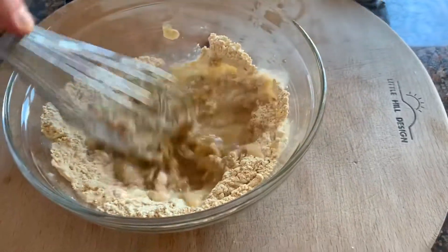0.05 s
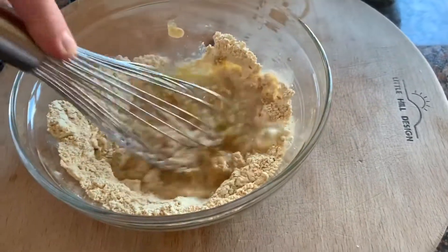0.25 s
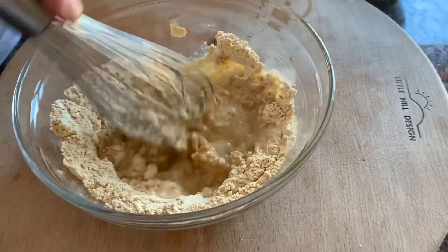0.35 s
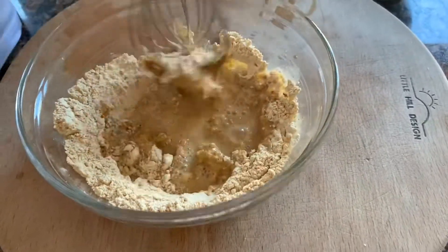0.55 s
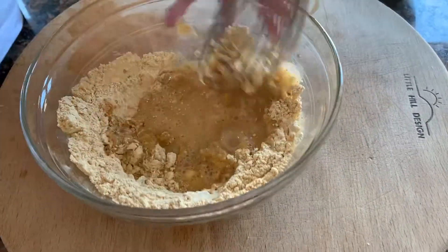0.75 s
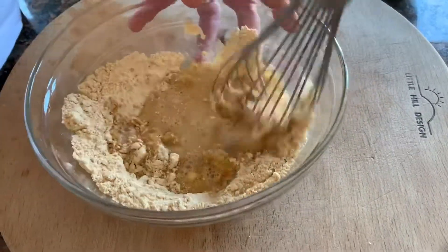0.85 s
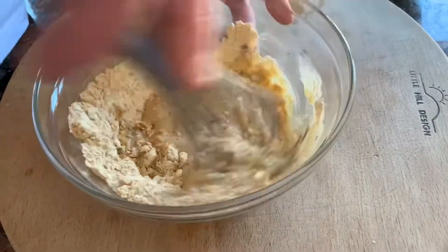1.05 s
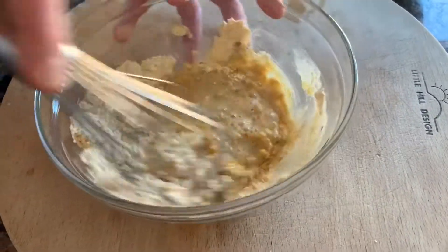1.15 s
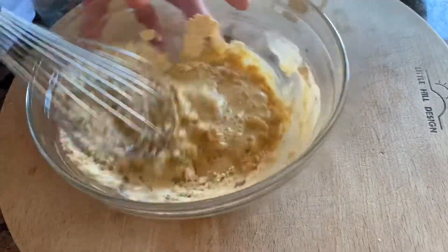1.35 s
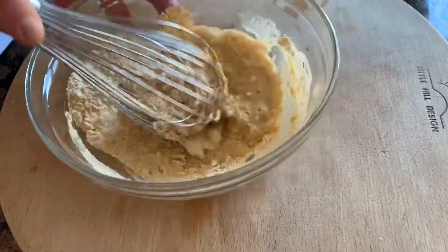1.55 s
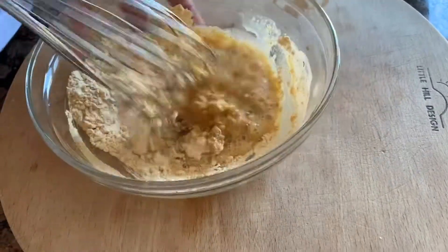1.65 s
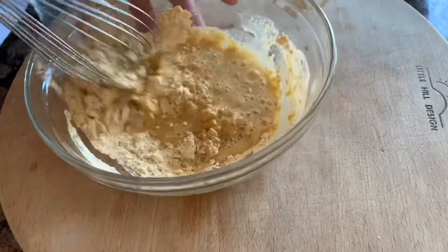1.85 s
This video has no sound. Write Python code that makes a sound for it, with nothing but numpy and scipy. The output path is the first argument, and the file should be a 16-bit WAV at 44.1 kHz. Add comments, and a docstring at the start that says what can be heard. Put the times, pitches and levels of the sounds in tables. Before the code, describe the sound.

A wire whisk works through thick batter, thudding and knocking against a glass bowl.

```python
"""A wire whisk works stiff batter in a glass bowl on a wooden board, close by in a kitchen.
Its wires thud through the batter and knock twice on the coated glass, which rings.
The stroke drags round the bowl among wet crackle, smacks and small ticks, while the
whisk's weight bumps the board. At the end a bare wire clinks on the glass."""
import sys
import numpy as np
from scipy import signal
from scipy.fft import rfft, irfft
from scipy.io import wavfile

SR = 44100
rng = np.random.default_rng(int(sys.argv[2]) if len(sys.argv) > 2 else 0)


def log_audio(samples):
    """Write samples as a 16-bit WAV file to the path given in sys.argv[1]."""
    # one column per channel
    frames = np.atleast_2d(samples).T
    # limit to full scale, then quantise
    limited = np.clip(frames, -1, 1)
    pcm = np.round(limited * 32767).astype(np.int16)
    wavfile.write(sys.argv[1], SR, pcm)


N = 83790
T, HZ = np.arange(N) / SR, np.fft.rfftfreq(2 * N, 1 / SR)
# low ring of the bowl on its board: pitch_hz, level_db, t60_s
BODY_MODES = [(149, -2, 0.091), (183.1, -4, 0.31), (223, -6.5, 0.14), (316, -10, 0.34), (481, 0, 0.13),
              (592.3, 0, 0.18)]


def amp(db):
    """Decibels to gain."""
    return 10 ** (np.asarray(db) / 20)


def unit_rms(x):
    """Scales to rms 1."""
    return x / np.sqrt(np.mean(x ** 2) + 1e-20)


def curve(points, hz=HZ):
    """Reads a table on a log-frequency axis."""
    freq, value = np.transpose(points)
    return np.interp(np.log(hz + 1), np.log(freq + 1), value)


def swell(peak_s):
    """An envelope that rises to 1 and dies away."""
    return T / peak_s * np.exp(1 - T / peak_s)


def add(mix, start_s, sound):
    """Mixes a sound in at its start time."""
    part = mix[..., round(start_s * SR):][..., :sound.shape[-1]]
    part += sound[..., :part.shape[-1]]


def filtered(x, response):
    """Applies a frequency response."""
    return irfft(rfft(x, 2 * N) * response)[..., :N]


def colour(x, eq):
    """Causal EQ, scaled to keep the power of white noise."""
    gain = unit_rms(amp(curve(eq)))
    log_gain = np.log(np.r_[gain, gain[-2:0:-1]])
    return filtered(x, np.exp(np.conj(signal.hilbert(log_gain)))[:N + 1])


def stereo(pair, width):
    """Blends two unrelated signals to a left-right correlation set by frequency."""
    correlation = np.clip(curve(width), -1, 1)
    mid = filtered(pair[0], np.sqrt((1 + correlation) / 2))
    side = filtered(pair[1], np.sqrt((1 - correlation) / 2))
    return np.array([mid + side, mid - side])


def noise(width=None):
    """Stereo white noise, by default with the width of a close source."""
    # close stereo image: freq_hz, correlation
    close_width = [(100, 0.91), (400, .93), (800, 0.57), (1500, 0.34), (2700, 0.068), (6000, 0.47),
                   (10000, 0.93), (14000, 1)]
    return stereo(rng.choice([-1., 1.], (2, N)), width or close_width)


def ring(modes, waver=0, waver_hz=120):
    """Dying sines of a struck object; with waver, rubbing wires unsettle the high ones most."""
    out, t = np.zeros(N), T[:N // 3]
    knots = rng.standard_normal((len(modes), 2, 400))
    for k, (hz, db, t60) in enumerate(modes):
        real, imag = (np.interp(t * waver_hz, np.arange(len(row)), row) for row in knots[k])
        wobble = 1 + waver * np.sqrt(hz / 4000) * (real + 1j * imag)
        tone = unit_rms(abs(wobble)) * np.sin(2 * np.pi * hz * t + np.angle(wobble))
        add(out, 0, (-1) ** k * amp(db - 60 * t / t60) * tone)
    return out


def friction(texture, levels, eq):
    """A texture that swells and fades with the stroke."""
    return colour(unit_rms(texture) * amp(np.interp(T, *np.transpose(levels))), eq)


def room_tone(level_db=-70):
    """A faint, steady rumble under everything."""
    # bass-heavy bed: freq_hz, gain_db
    eq = [(20, -17), (65, -1), (110, -10.5), (250, -14), (600, -36), (2000, -25), (16000, -40.5)]
    return amp(level_db) * colour(noise(), eq)


def drag():
    """The whisk drags through the batter with a dark scrape."""
    # swell of the stroke: time_s, level_db
    levels = [(0, -59), (.09, -59), (.125, -50), (.18, -56.5), (.27, -41.5), (.5, -59), (.57, -50.5),
              (.8, -53), (.88, -60), (.99, -68), (1.09, -62.5), (1.2, -59.5), (1.369, -48.5), (1.45, -53.5),
              (1.58, -76.5), (1.74, -82), (1.829, -56), (1.9, -69.5)]
    # muffled scrape: freq_hz, gain_db
    eq = [(25, -40.5), (65, -6), (105, -3), (180, 1), (300, -1), (600, -1), (900, -5.5), (1400, -9),
          (2200, -20.5), (4000, -31), (16000, -69)]
    return friction(noise(), levels, eq)


def pops(per_s=900, sizes=24, spread_db=3, decay_cycles=3):
    """Sparse bubbles of many sizes, each ringing for a few cycles."""
    out, t = np.zeros(N), T[:SR // 100]
    for hz in np.geomspace(3500, 14000, sizes):
        strength = amp(spread_db * np.minimum(rng.exponential(1, N), 4))
        bursts = rng.random(N) < per_s / sizes / SR
        bubble = np.sqrt(hz) * np.exp(-hz * t / decay_cycles) * np.sin(2 * np.pi * hz * t)
        out += signal.oaconvolve(strength * bursts, bubble)[:N]
    return unit_rms(out)


def crackle(pop_db=-5):
    """Batter and crumbs crackle wetly: hiss dotted with bubbles."""
    # swell of the crackle: time_s, level_db
    levels = [(0, -63), (0.051, -75.5), (0.073, -60), (0.113, -53.5), (.14, -66), (.3, -76.5), (.46, -69),
              (0.751, -61.5), (.85, -72.5), (.92, -63.5), (1, -70.5), (1.021, -61), (1.07, -57.5),
              (1.1, -66), (1.279, -69), (1.64, -73), (1.76, -86), (1.9, -78)]
    # wet fizz: freq_hz, gain_db
    eq = [(200, 4), (900, -4.5), (1700, 10), (3000, -2.5), (5000, -0.5), (8000, 2), (11000, -8.5),
          (13500, -4), (16000, -33.5)]
    return friction(noise() + amp(pop_db) * pops(), levels, eq)


def ticks(snap_db=9, snap_s=0.00046):
    """Wires and snapping batter tick, a spike and a puff each; longer ticks have less spike."""
    # small ticks: start_s, level_db, decay_s
    hits = [(0.0717, -55, 0.0028), (.519, -56, 0.0055), (1.0115, -48.5, 0.0026), (1.021, -47.5, .0015),
            (1.0716, -49, 0.0027), (1.1877, -28.5, 0.0019), (1.395, -53.5, 0.0011), (1.514, -58, .001)]
    # bright snap: freq_hz, gain_db
    eq = [(100, -27), (1900, -15), (2550, 4), (3200, 0.5), (3700, -6), (5500, -1.5), (8500, 0.5),
          (11000, -3.5), (13000, 2), (16000, -5)]
    out = np.zeros((2, N))
    for start, db, decay in hits:
        puff = np.exp(-T / decay) * noise()
        spike = amp(snap_db) * np.exp(1 - decay / snap_s) * (T == 0)
        add(out, start, amp(db) * (puff + spike))
    return colour(out, eq)


def board_bumps(pitch_hz=69.6, swell_s=.028):
    """The whisk's weight pushes the board, which sways for a few deep, soft cycles."""
    # pushes on the board: start_s, level_db
    pushes = [(0.101, -47.5), (0.216, -46), (0.399, -61), (0.532, -53), (.6, -50.5), (0.681, -53),
              (0.76, -53.5), (1.343, -53.5), (1.812, -62.5)]
    out = np.zeros(N)
    sway = swell(swell_s) ** 2 * np.sin(2 * np.pi * pitch_hz * T)
    for start, db in pushes:
        add(out, start, amp(db) * sway)
    return out


def falling_tone(from_hz, to_hz, fall_s):
    """A sine whose pitch drops and settles."""
    hz = to_hz + (from_hz - to_hz) * np.exp(-T / fall_s)
    return np.sin(2 * np.pi * np.cumsum(hz) / SR)


def thuds(thump_db=-15.5, thump_s=.008, batter_cutoff_hz=1600, return_cutoff_hz=710):
    """Wires bump through the batter: quick falling chirps that return twice and ring the bowl."""
    # wire bumps: peak_s, level_db, pitch_fall_s, body_ring_db
    hits = [(0.1024, -39.5, .002, -11), (.109, -42, .002, 1), (.1165, -39.5, .0019, 1.5),
            (0.5238, -35.5, 0.0015, -11), (.5888, -26.5, .0018, -15), (0.6217, -27, .0013, -11),
            (0.6754, -25.5, 0.001904, -12.5), (.709, -33.5, .0015, -16), (0.7543, -26.5, .0017, -23),
            (0.801, -39.5, .0017, -5.5)]
    # duller returns through bowl and board: delay_s, gain_db
    returns = [(.0057, 0.5), (.0101, -5)]
    chirps, resonance, body = np.zeros(N), np.zeros(N), ring(BODY_MODES)
    thump = swell(thump_s) * falling_tone(477, 102, thump_s)  # the batter gives way
    for time, db, fall, body_db in hits:
        rise = 1.6 * fall
        chirp = swell(rise) ** 6.7 * falling_tone(2586, 165, fall)
        add(chirps, time - rise, amp(db) * chirp)
        add(resonance, time, amp(db + body_db) * body + amp(db + thump_db) * thump)
    chirps = filtered(chirps, 1 / (1 + (HZ / batter_cutoff_hz) ** 10))
    dull = filtered(chirps, 1 / (1 + (HZ / return_cutoff_hz) ** 4))
    for polarity, (delay, db) in zip((-1, 1), returns):
        add(resonance, delay, polarity * amp(db) * dull)
    return np.ones((2, 1)) * (chirps + resonance)


def smacks(rise_s=0.00092):
    """Soft wet puffs where the batter pulls off the wires."""
    # the batter parts: start_s, level_db
    hits = [(0.1483, -48), (0.5946, -47), (0.886, -57.5), (1.627, -57)]
    # duller than the ticks: freq_hz, gain_db
    eq = [(1500, -30), (3500, -7), (4700, -4), (8000, -9), (15000, -26.5)]
    out = np.zeros((2, N))
    for start, db in hits:
        add(out, start, amp(db) * swell(rise_s) * noise())
    return colour(out, eq)


def wires(modes, count=6, spread_hz=70):
    """Several nearly equal wires ring together, so each mode is a beating cluster."""
    t, out = T[:N // 6], 0
    for hz, db, t60 in modes:
        detune, phase = spread_hz * rng.standard_normal((count, 1)), rng.random((count, 1))
        fade = amp(db - 60 * t / t60)
        cluster = fade * np.sin(2 * np.pi * ((hz + detune) * t + phase)).sum(0)
        out = out + unit_rms(cluster) * np.sqrt(np.mean(fade ** 2) / 2)
    return np.pad(out, (0, N - len(out)))


def knocks(rise_s=0.0026, glass_db=-30, shimmer_db=-52):
    """The whisk hits coated glass with a tap and a clatter, setting bowl and wires ringing."""
    # two knocks and their rebounds: start_s, clatter_db, decay_s, tap_db
    hits = [(0.2103, -18, 0.0062, 1), (.215, -25, .006, -8.5), (0.2273, -23, 0.013, -4.5),
            (.247, -28, 0.014, -11.5), (0.3538, -29, 0.019, -12.5), (.3622, -26.5, 0.01, -4)]
    # midrange clunk: freq_hz, gain_db
    eq = [(40, -38.5), (75, -16.5), (130, -16.5), (220, -2), (340, 4), (600, -5.5), (800, 2.5), (1400, 4),
          (2000, 0), (3000, -8), (3900, -22), (6000, -36.5), (8300, -29.5), (10000, -55.5)]
    # stereo image of the clatter: freq_hz, correlation
    width = [(300, 1), (800, 0.72), (1500, 0.68), (2500, 0.041), (6000, 0.9), (10000, 0.77)]
    # glass damped by batter: pitch_hz, level_db, t60_s
    glass_modes = [(307.4, -6.5, .15), (362.6, -2.5, 0.16), (605, -10.5, 0.46), (762.4, -7.5, 0.15),
                   (862.4, -10, 0.3), (1152, -3.5, 0.24), (1200, -5, 0.23), (1381, 1, 0.21),
                   (1677, -3, .35), (1732, -3, 0.13), (2450, -5.5, 0.16)]
    # high shimmer of the wires: pitch_hz, level_db, t60_s
    shimmer_modes = [(8870, 1, 0.12), (10920, 0, 0.14), (14130, -0.5, .09), (14430, 0.5, .09)]
    contact, resonance = np.zeros((2, N)), np.zeros(N)
    glass = ring(glass_modes, waver=.25)
    tap = np.exp(-T * SR / 2) * (1 - np.exp(-.5))  # softened by the coat of batter
    for start, clatter_db, decay, tap_db in hits:
        clatter = np.minimum(T / rise_s, 1) * np.exp(-T / decay) * noise(width)
        add(contact, start, amp(clatter_db) * clatter + amp(tap_db) * tap)
        add(resonance, start, amp(tap_db + glass_db) * glass)
        add(resonance, start, amp(tap_db + shimmer_db) * wires(shimmer_modes))
    return colour(contact, eq) + resonance


def clinks(decay_s=0.01, wire_db=-4, body_db=-10, body_delay_s=0.00585):
    """A bare wire buzzes on the glass, rings, and nudges the bowl."""
    # wire contacts: start_s, level_db
    hits = [(1.79, -55), (1.7972, -39.5), (1.801, -41)]
    # ring of bare wire: pitch_hz, level_db, t60_s
    wire_modes = [(1830, -4.5, 0.066), (2153, 4, 0.093), (3250, -4.5, .18), (4016, -10.5, .16),
                  (4570, -7, .13), (6104, -3, 0.15), (7860, -10.5, 0.18), (9610, 4, 0.067),
                  (10480, -8.5, 0.15), (12000, -12, 0.083), (13830, -6, 0.053), (14900, -8, .08)]
    # metallic buzz: freq_hz, gain_db
    eq = [(1000, -7), (2000, 12), (2800, -18), (4200, 5), (5400, -13.5), (10000, 7), (14500, -8.5)]
    out, wire, body = np.zeros((2, N)), wires(wire_modes), ring(BODY_MODES)
    for start, db in hits:
        buzz = colour(np.exp(-T / decay_s) * noise(), eq)
        add(out, start, amp(db) * (buzz + amp(wire_db) * wire))
        add(out, start + body_delay_s, amp(db + body_db) * body)
    return out


def kitchen(send, build_s=0.005):
    """A diffuse reverb tail that dies at its own speed in each band."""
    # reverb time: freq_hz, t60_s
    decay = [(100, 1.2), (500, .5), (1400, 0.25), (2600, 0.75), (6000, 0.25), (14000, 0.47)]
    # tone of the tail: freq_hz, gain_db
    eq = [(60, -1), (300, -12.5), (700, -2.5), (1400, 9), (2600, -2.5), (5000, 3), (9000, -2.5),
          (15000, -8)]
    # stereo image of the tail: freq_hz, correlation
    width = [(100, 0.7), (400, 0.3), (800, 0.46), (1400, -0.18), (3000, -.25), (6000, 0.77), (11000, .9)]
    hz, t, bands = signal.stft(stereo(rng.standard_normal((2, N)), width), SR, nperseg=256)
    fade = amp(-60 * t / curve(decay, hz)[:, None])
    tail = signal.istft(bands * fade, SR, nperseg=256)[1][:, :N]
    tail *= 1 - np.exp(-(T / build_s) ** 2)
    tail /= np.linalg.norm(tail[0])
    return filtered(send.mean(0), rfft(tail, 2 * N) * amp(curve(eq)))


def scene():
    """The whisking up close in stereo, with the kitchen around it."""
    # panning of the knocks: freq_hz, left_minus_right_db
    knock_pan = [(100, 1.5), (350, 6), (750, -7), (1300, -2.5), (2500, 1.5), (10000, 0)]
    # phase between the channels for close sound: freq_hz, left_lead_rad
    phase_lead = [(50, -0.61), (300, -0.41), (800, -0.43), (1500, -1.4), (3000, -1.1), (6000, -1.89),
                  (10000, -1.2), (14000, 0.67)]
    knock, thud, tick, clink = knocks(), thuds(), ticks() + smacks(), clinks()
    sides = np.array([[.5], [-.5]])
    panned_knock = filtered(knock, amp(sides * curve(knock_pan)))
    close = panned_knock + thud + tick + clink + drag() + crackle() + board_bumps()
    close = filtered(close, np.exp(1j * sides * curve(phase_lead)))
    send = amp(-6) * knock + amp(-13) * thud + amp(-9) * tick + amp(-10) * clink
    return close + kitchen(send) + room_tone()


def record(dry):
    """A steep low-pass trims the very top of the treble."""
    lowpass = signal.firwin(401, cutoff=16150, window=("kaiser", 9), fs=SR)
    return signal.oaconvolve(dry, lowpass[None], "same")


dry = scene()
out = record(dry)
log_audio(out)
```